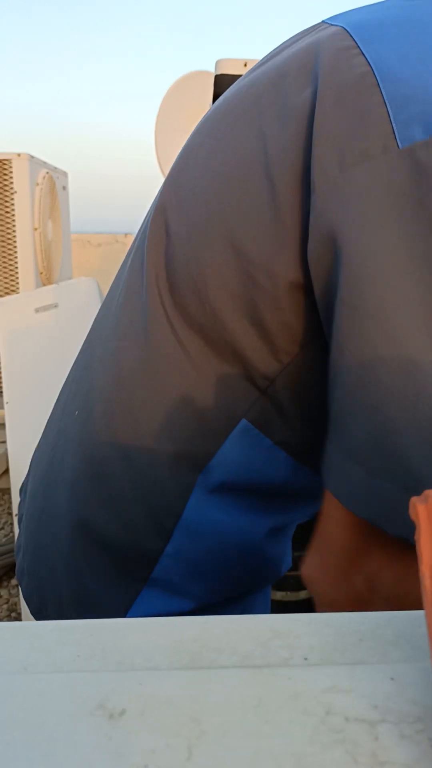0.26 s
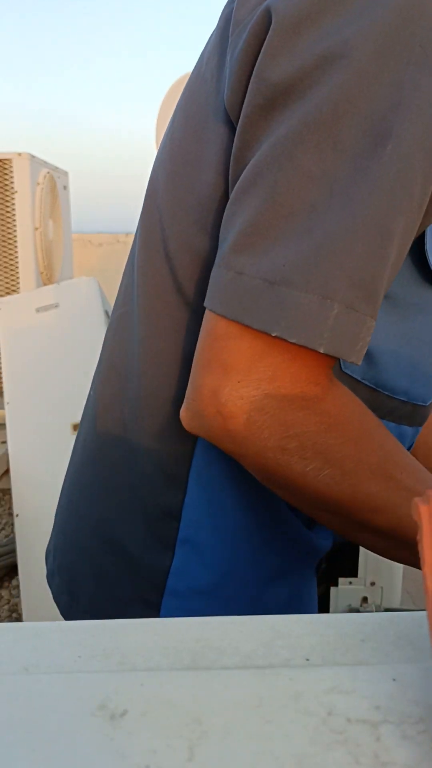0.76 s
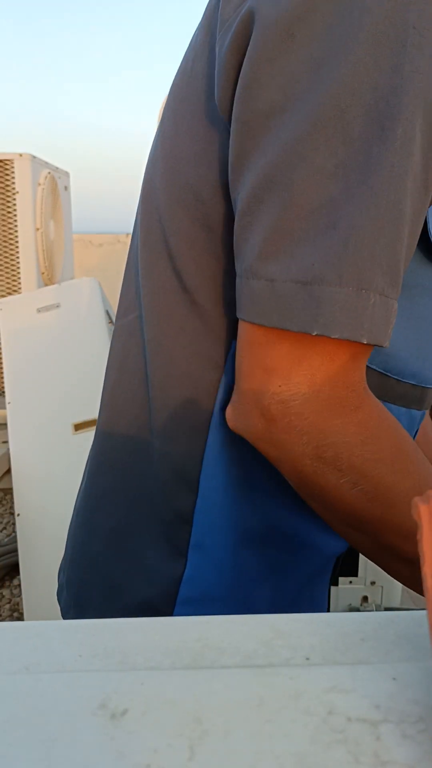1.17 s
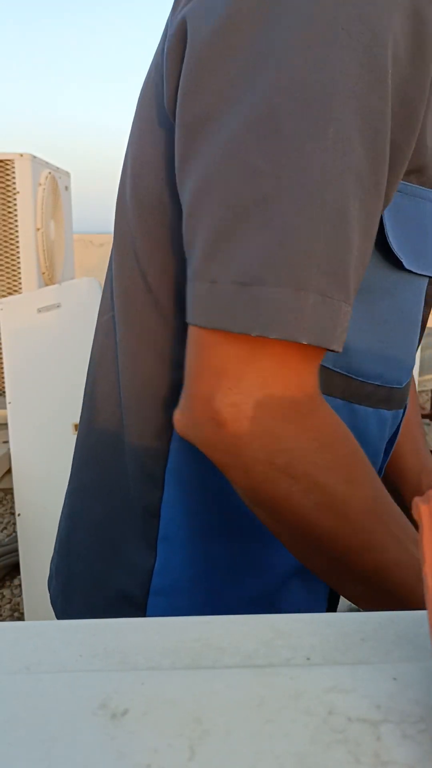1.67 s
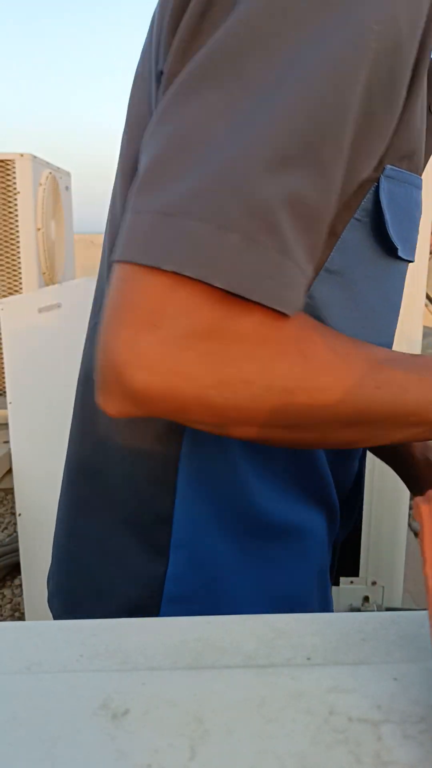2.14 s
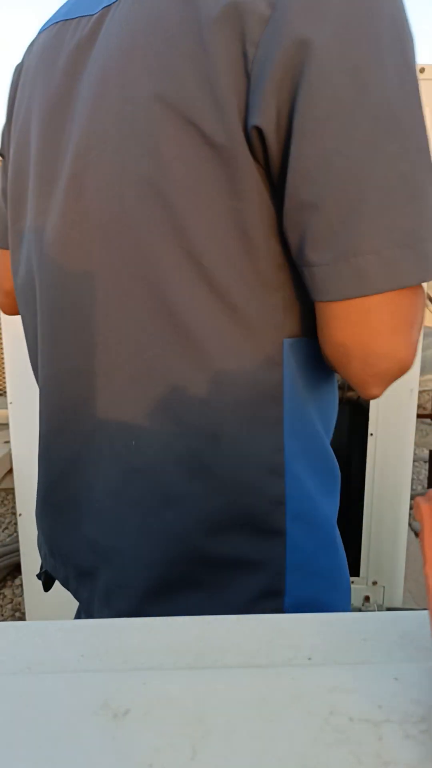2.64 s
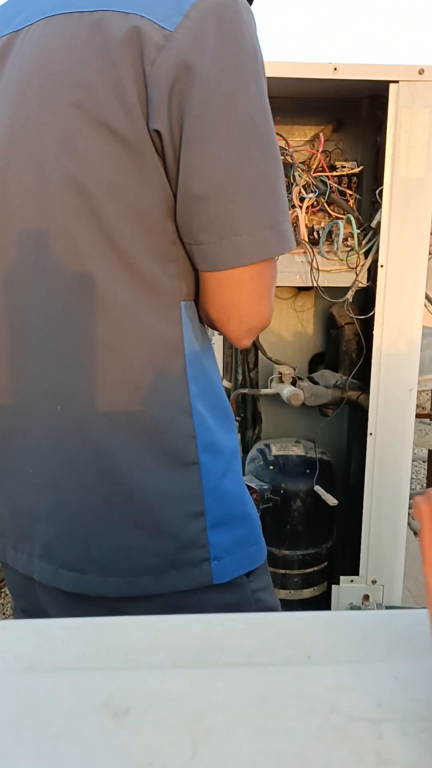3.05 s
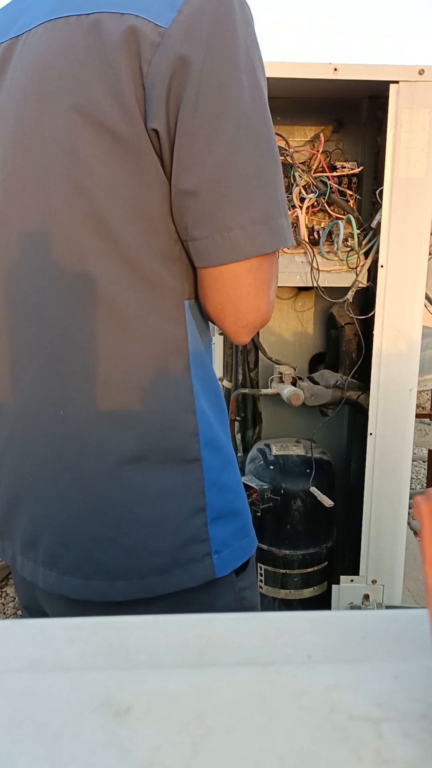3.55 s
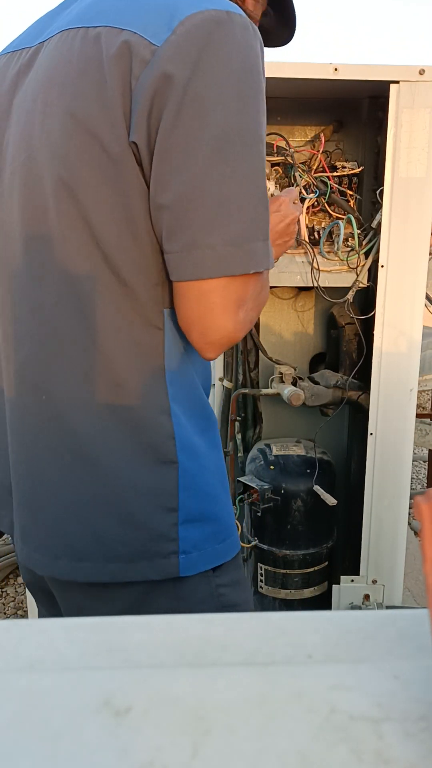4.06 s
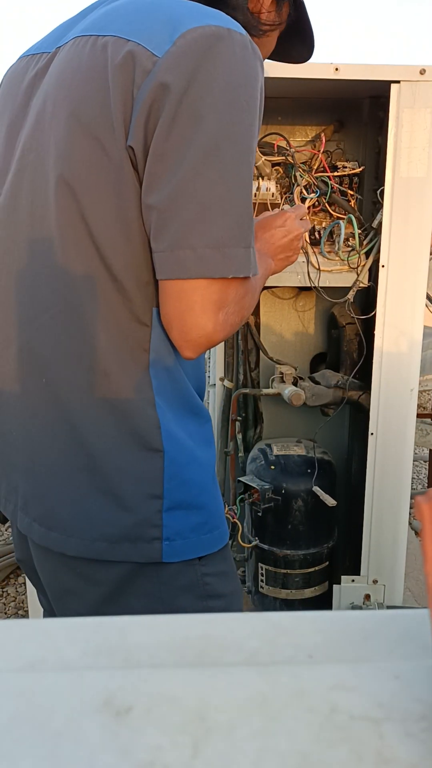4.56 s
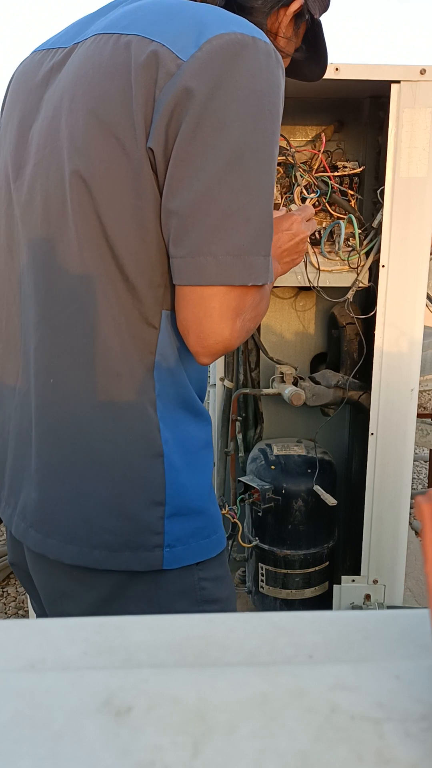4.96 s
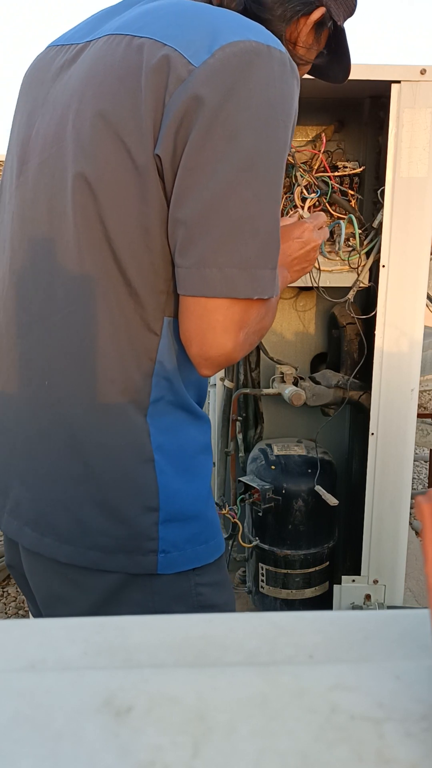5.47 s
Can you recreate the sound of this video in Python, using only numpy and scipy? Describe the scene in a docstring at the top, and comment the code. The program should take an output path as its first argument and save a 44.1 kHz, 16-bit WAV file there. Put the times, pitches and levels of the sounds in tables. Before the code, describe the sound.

Outdoors on a flat roof, air-conditioning units run constantly with rushing air, low hum, thin compressor whine and uneven fan throb. Rapid hard wind puffs slam the right side of a small stereo recorder for the first two-thirds of a second, with brief whistles. After a calmer spell the puffs return in looser groups. A few faint ticks from wiring pass almost unnoticed.

```python
"""Hard puffs of light wind buffet the right port of a small recorder at once, then return in looser groups.
Behind them air-conditioning units run on a flat roof: filtered noise for rushing air, sines for the
throbbing fan blades, the compressor's whine and the motors' hum. Early on the recorded level of the
background swells briefly. The wind is shaped noise plus rough tones; short whistles and small ticks
join it, and a limiter turns down the peaks."""
import sys
import numpy as np
from scipy import signal
from scipy.fft import rfft, irfft, next_fast_len
from scipy.io import wavfile
from scipy.ndimage import uniform_filter1d, minimum_filter1d, map_coordinates

SR = 44100
rng = np.random.default_rng(int(sys.argv[2]) if len(sys.argv) > 2 else 0)


def persist_wave(psi):
    """Save psi, clipped to +-1, as 16-bit WAV."""
    counts = np.round(np.clip(psi, -1, 1) * 32767).astype(np.int16)
    wavfile.write(sys.argv[1], SR, np.atleast_2d(counts).T)


N = 252252


def amp(db):
    """Decibels to gain."""
    return 10 ** (np.asarray(db) / 20)


def unit(x):
    """Scale to rms 1."""
    return x / np.sqrt(np.mean(x ** 2) + 1e-20)


def seconds():
    """Time of every sample."""
    return np.arange(N) / SR


def over_time(points):
    """Read (s, value) points at every sample."""
    return np.interp(seconds(), *np.transpose(points))


def along(points, hz):
    """Read (Hz, value) points on a log frequency axis."""
    f, v = np.transpose(points)
    return np.interp(np.log(hz + 1), np.log(f + 1), v)


def wobble(rate_hz):
    """Smooth random curve with rate_hz knots a second."""
    knots = rng.standard_normal(int(N * rate_hz / SR) + 4)
    return map_coordinates(knots, [seconds() * rate_hz])


def filtered(x, response):
    """Multiply the spectrum of x by a response of frequency."""
    m = next_fast_len(N + SR // 2)
    hz = np.fft.rfftfreq(m, 1 / SR)
    return irfft(rfft(x, m) * response(hz), m)[..., :N]


def tone(hz, level_db, drift_rad, flutter_db):
    """Machine tone whose phase and strength waver in the moving air."""
    phase = 2 * np.pi * (hz * seconds() + rng.random()) + drift_rad * wobble(3.0)
    return np.sqrt(2) * amp(level_db + flutter_db * wobble(5.05)) * np.sin(phase)


def wandering(hz, spread, flutter_db):
    """Rough tone of rms 1: pitch and strength change within a few cycles."""
    wandering_hz = hz * np.exp(spread * wobble(170))
    phase = 2 * np.pi * (np.cumsum(wandering_hz) / SR + rng.random())
    return unit(amp(flutter_db * wobble(130)) * np.sin(phase))


# Air rushing through fans and coils. Each row: frequency in Hz, density in dB per Hz before level_db.
AIR_SPECTRUM = [(20,-81),(45,-75),(75,-57.5),(160,-53),(195,-63.5),(220,-60.5),(250,-51.5),(350,-56.5),(450,-57),(560,-61.5),(660,-61.5),(760,-67.5),(970,-68),(1070,-71),(1200,-68),(1450,-72),(2200,-76),(4500,-81.5),(15500,-96.5)]
# Likeness of the rush at the two ports. Each row: frequency in Hz, coherence.
PORT_COHERENCE = [(60,0.94),(300,0.96),(640,0.91),(1400,0.72),(2100,0.46),(5000,0.24),(7500,.02)]


def air_rush(level_db, patchy_db):
    """Turbulent fan air: alike at both ports in the bass, nearly unrelated in the treble."""
    z = signal.stft(rng.standard_normal((2, N)), nperseg=512)[2]
    # strength varies in smooth patches of frequency and time
    patches = uniform_filter1d(rng.standard_normal(z.shape[1:]), size=6, axis=0)
    patches = unit(uniform_filter1d(patches, size=16, axis=1))
    pair = signal.istft(z * amp(patchy_db * patches), nperseg=512)[1][:, :N]

    def mid_side_response(hz):
        # mid and side shares cos and sin give the ports a coherence of cos(2 * angle)
        angle = np.arccos(along(PORT_COHERENCE, hz)) / 2
        return amp(along(AIR_SPECTRUM, hz)) * np.array([np.cos(angle), np.sin(angle)])

    mid, side = filtered(pair, mid_side_response)
    return amp(level_db) * np.sqrt(SR / 2) * np.array([mid + side, mid - side])


MAINS_HZ = 60.03
# Magnetic hum. Each row: multiple of the mains rate, level in dB rms before flutter and ports.
MAINS_HUM = [(2, -34), (4, -47.5), (6, -47.5), (10, -40.5)]


def motor_hum():
    """Motor magnetism hums at even multiples of the mains rate."""
    return sum(tone(k * MAINS_HZ, db, drift_rad=0.082, flutter_db=0.5) for k, db in MAINS_HUM)


SHAFT_HZ = 57.63
# Compressor tones. Each row: multiple of the shaft rate, starting level in dB rms before flutter
# and ports, growth in dB per s.
COMPRESSOR_TONES = [(6, -33, -0.29), (10, -37.5, 0.82), (12, -50.5, 0.5), (17, -55, 0), (18, -58.5, 0),
                    (21, -53, -2.2), (29, -64, 0), (38, -59.5, -0.2)]


def compressor():
    """The shaft turns a little slower than the mains and whines at its multiples."""
    whine = np.zeros(N)
    for k, start_db, db_per_s in COMPRESSOR_TONES:
        level_db = start_db + db_per_s * seconds()
        whine += tone(k * SHAFT_HZ, level_db, drift_rad=0.054, flutter_db=0.95)
    return whine


FAN_HZ, THROB_FLICKER_DB = 88.3, 2.5  # blade-passing rate, quick flicker in the turbulent air
# Blade tone as the fans drift in and out of step. Each row: time in s, level in dB rms before flicker and ports.
THROB_LEVELS = [(0.1, -40), (0.25, -46), (0.38, -31), (0.72, -33), (0.9, -44), (1.07, -33), (1.2, -40),
                (1.42, -27.5), (1.67, -37.5), (1.78, -29.5), (2.0, -29), (2.22, -43), (2.38, -34),
                (2.52, -38), (2.68, -27.5), (2.83, -32), (2.95, -39), (3.22, -34), (3.33, -35),
                (3.5, -28.5), (3.95, -37), (4.08, -31), (4.25, -29.5), (4.42, -34), (4.55, -32),
                (4.75, -35.5), (5.06, -29.5), (5.18, -46), (5.42, -27), (5.7, -35)]
# Steady overtones of the blades. Each row: frequency in Hz, level in dB rms before flutter and ports.
BLADE_OVERTONES = [(165, -51), (176.5, -46), (233, -48), (258, -55)]


def fans(drift_rad):
    """The blade tone throbs along its level curve, with mostly weaker overtones above."""
    throb = tone(FAN_HZ, over_time(THROB_LEVELS), drift_rad, flutter_db=-0.3)
    throb *= amp(THROB_FLICKER_DB * wobble(21.97))
    overtones = sum(tone(hz, db, drift_rad=0.55, flutter_db=3.0) for hz, db in BLADE_OVERTONES)
    return throb + overtones


# Colour of the left microphone port. Each row: frequency in Hz, gain in dB.
LEFT_PORT_COLOUR = [(800, -1), (2200, 1.5), (2700, -2.5), (3200, 2.5), (3800, -4.5), (4250, 0.5),
                    (5000, -2), (5650, 3.5), (6100, 0), (6600, 4.5), (7700, -19), (8600, -14), (10400, -4),
                    (11500, -3.5), (12700, 3), (13400, -0.5), (14200, 7), (14850, 1), (15500, 3)]
# Colour of the right microphone port. Each row: frequency in Hz, gain in dB.
RIGHT_PORT_COLOUR = [(100, -0.5), (200, 0.5), (350, -0.5), (600, -5.5), (950, 0), (1650, -4), (2200, -1.5),
                     (4500, -5), (6500, -9), (7500, -2), (8200, 1.5), (9000, -1), (9900, 1), (10600, -4),
                     (12200, -2.5), (14000, -17)]


def ports(x, lead_ms):
    """Each port colours the sound, which reaches the left one slightly earlier."""
    def response(hz):
        half_lead = np.pi * hz * lead_ms / 1000
        shift = np.exp(1j * half_lead * np.array([[1], [-1]]))
        return amp([along(LEFT_PORT_COLOUR, hz), along(RIGHT_PORT_COLOUR, hz)]) * shift

    return filtered(x, response)


SWELL_START_S, SWELL_END_S, SWELL_RISE_S, SWELL_FALL_S, SWELL_DB = 0.512, 0.854, 0.017, 0.06, 6.5


def swell():
    """Level of the background: jumps up, holds for about a quarter of a second, sinks back."""
    t = seconds()
    rise = (t - SWELL_START_S) / SWELL_RISE_S
    fall = (SWELL_END_S - t) / SWELL_FALL_S
    return amp(SWELL_DB * np.clip(np.minimum(rise, fall), 0, 1))


# Small ticks of wires and terminals under the fingers. Each row: start in s, peak in dB before colouring.
WIRE_TICKS = [(0.042, -31), (0.783, -27), (2.161, -31), (3.43, -36), (3.85, -31), (4.439, -32)]
# Colour of the ticks. Each row: frequency in Hz, gain in dB.
TICK_SPECTRUM = [(1000, -30), (3500, -9), (6000, 2), (15000, -3)]
TICK_T60_S = 0.01


def wires():
    """Each tick is a tiny bright noise crack with a steep exponential decay."""
    strength = np.zeros(N)
    for start_s, db in WIRE_TICKS:
        t = seconds() - start_s
        strength += (t >= 0) * amp(db - 60 * np.abs(t) / TICK_T60_S)
    noise = rng.uniform(-1, 1, (2, N))
    return filtered(strength * noise, lambda hz: amp(along(TICK_SPECTRUM, hz)))


# Whistles at the right port. Each row: centre in s, length in s, mean pitch in Hz, level at the centre in dB.
PORT_WHISTLES = [(0.082, 0.019, 660, -19), (0.259, 0.018, 680, -31), (0.401, 0.014, 800, -16.5),
                 (0.534, 0.022, 1205, -19), (0.633, 0.012, 980, -25)]


def whistles():
    """Air whistles for an instant across the edge of the right port."""
    right = np.zeros(N)
    for centre_s, length_s, hz, db in PORT_WHISTLES:
        envelope = np.exp(-(2 * (seconds() - centre_s) / length_s) ** 2)
        right += amp(db) * envelope * wandering(hz, spread=0.04, flutter_db=2.5)
    return np.array([np.zeros(N), right])


# Puffs on the exposed right port. Each row: centre in s, length in s, pressure in dB, eddy pitch in Hz,
# rasp in dB and thud in dB relative to the pressure.
WIND_PUFFS = [(0.049, 0.015, -7, 268.3, -19.5, -16), (0.083, 0.021, -1, 309.6, -16, -23),
              (0.107, 0.015, -7, 363.7, -28, -26), (0.129, 0.02, -6, 300.7, -25, -21),
              (0.174, 0.033, -8, 279.8, -13, -20), (0.203, 0.018, -8, 144.4, -32, -28),
              (0.261, 0.022, -15, 289.2, -12, -14), (0.29, 0.039, -12, 255, -26, -7),
              (0.383, 0.016, -7, 289, -10, -20), (0.4, 0.018, -4, 260.5, -5.5, -14),
              (0.417, 0.016, -5, 370.3, -20, -28), (0.471, 0.031, -3.5, 179.5, -11.5, -13),
              (0.513, 0.019, -3.5, 309.5, -19, -11), (0.533, 0.02, 0, 308.6, -11, -20),
              (0.57, 0.025, -17, 220.5, -18, -13), (0.616, 0.033, -10, 260.4, -22, -15),
              (0.656, 0.029, -7, 289.2, -18, -10), (1.074, 0.03, -22, 299.2, -18, -21),
              (1.475, 0.06, -19, 250.6, -30, -8), (1.628, 0.039, -24.5, 250.1, -16, -3),
              (2.717, 0.028, -13.5, 281, -18, -6), (2.768, 0.016, -18, 230.2, -20, -8),
              (2.798, 0.017, -16.5, 231.4, -20, -11), (3.856, 0.025, -8.5, 308, -14, -24),
              (3.879, 0.018, -7, 224.8, -11, -10), (3.904, 0.024, -7, 296, -15.5, -11),
              (3.931, 0.021, -2, 294, -14.5, -22), (3.956, 0.02, -10, 199.4, -19, -13),
              (4.015, 0.03, -16.5, 170.6, -20, -2), (4.307, 0.013, -19, 198.8, -24, -27),
              (4.361, 0.03, -10.5, 288.5, -19.5, -26), (4.396, 0.015, -10, 272.9, -13, -24),
              (4.498, 0.018, -10.5, 274.5, -25, -24), (4.527, 0.0062, -14.5, 250, -22, -16),
              (4.866, 0.012, -18.5, 282.7, -22, -14), (5.279, 0.015, -18, 221, -25, -18),
              (5.317, 0.027, -4.5, 280.8, -15.5, -15), (5.38, 0.022, -9.5, 200, -23, -7),
              (5.578, 0.039, -30, 199.7, -23, 2), (5.715, 0.011, -10, 258.7, -30, -23)]
# Light breeze under the puffs. Each row: time in s, pressure in dB.
BREEZE_PRESSURE = [(0, -21.5), (.65, -39), (.85, -41), (1.05, -36), (1.5, -33), (1.95, -36.5), (2.5, -39),
                   (3.149, -44), (3.75, -39), (4.05, -30.5), (4.5, -34), (5.1, -39), (5.45, -24.5),
                   (5.7, -31)]
# Deep rumbles that reach the sheltered left port. Each row: centre in s, length in s, pressure in dB.
LEFT_RUMBLES = [(1.57, 0.092, -34), (2.79, 0.062, -27), (3.937, 0.11, -36)]
CALM_PITCH_HZ, CALM_RASP_DB, CALM_THUD_DB = 270.1, -20, -6
# slower air around each puff; its level follows half the puff's dB
WAKE_DB, WAKE_RISE_S, WAKE_FALL_S = -16.5, 0.024, 0.053
LEE_BREEZE_DB, LEE_WAKE_DB = -53, -20  # left port: own breeze, share of the wakes


def pressure(edge):
    """Wind pressure per port from puffs, wakes and breeze, with eddy pitch and shares of rasp and thud."""
    now = seconds()

    def plateau(centre_s, length_s):
        return 1 / (1 + np.abs(2 * (now - centre_s) / length_s) ** edge)

    puffs, wakes, pitch_hz = np.zeros(N), np.zeros(N), np.full(N, CALM_PITCH_HZ)
    rasp, thud = np.full(N, amp(CALM_RASP_DB)), np.full(N, amp(CALM_THUD_DB))
    for centre_s, length_s, db, hz, rasp_db, thud_db in WIND_PUFFS:
        shape = plateau(centre_s, length_s)
        puffs += amp(db) * shape
        # each puff pulls pitch and shares towards its own
        pitch_hz += shape * (hz - pitch_hz)
        rasp += shape * (amp(rasp_db) - rasp)
        thud += shape * (amp(thud_db) - thud)
        wake_s = np.where(now < centre_s, WAKE_RISE_S, WAKE_FALL_S)
        wake = np.exp(-np.abs(now - centre_s) / wake_s)
        wakes = np.maximum(wakes, amp(WAKE_DB + db / 2) * wake)
    rumbles = sum(amp(db) * plateau(centre_s, length_s) for centre_s, length_s, db in LEFT_RUMBLES)
    left = rumbles + amp(LEE_WAKE_DB) * wakes + amp(LEE_BREEZE_DB)
    right = np.sqrt(puffs ** 2 + wakes ** 2 + amp(over_time(BREEZE_PRESSURE)) ** 2)
    return left, right, pitch_hz, rasp, thud


def eddies(spectrum, knee_hz, steady):
    """Eddy pressure of rms 1: low-passed noise, its strength evened out by steady (0 to 1)."""
    noise = rng.standard_normal(N)
    x = unit(filtered(noise, lambda hz: amp(along(spectrum, hz)) / np.hypot(1, hz / knee_hz)))
    strength = np.sqrt(np.abs(uniform_filter1d(x ** 2, size=500)) + 1e-3)
    return unit(x / strength ** steady)


# Broad buffeting of a port. Each row: frequency in Hz, relative density in dB.
BUFFET_SPECTRUM = [(20, -41), (45, -27), (80, 3.5), (140, 5), (190, -1.5), (290, 5), (430, 1.5), (600, -14),
                   (1000, -47), (1600, -55), (4000, -66), (9000, -87)]
# Rasp of fine eddies, strongest in hard puffs. Each row: frequency in Hz, relative density in dB.
RASP_SPECTRUM = [(200, -13), (400, 4.5), (620, 2), (860, -8), (1200, -15), (1600, -27.5), (3500, -41),
                 (7000, -51)]
# Thud of the largest eddies. Each row: frequency in Hz, relative density in dB.
THUD_SPECTRUM = [(15, -44), (30, -17), (50, 0), (70, 4), (140, -13), (500, -70), (2000, -110)]
SHEDDING_DB, LEE_THUD_DB = -1, -3  # pitched shedding and left thud, both relative to buffeting


def wind(bright_db, spurt_db):
    """Faster air makes smaller eddies, shed at a rough pitch, so strong puffs are brighter and firmer."""
    left, right, pitch_hz, rasp, thud = pressure(edge=6.23)
    fast = right ** 2 / (right ** 2 + amp(bright_db) ** 2)
    shedding = amp(SHEDDING_DB) * wandering(pitch_hz, spread=0.12, flutter_db=2.5)
    strong = unit(eddies(BUFFET_SPECTRUM, knee_hz=1500, steady=0.46) + shedding)
    weak = eddies(BUFFET_SPECTRUM, knee_hz=207, steady=0.59)
    exposed = np.sqrt(fast) * strong + np.sqrt(1 - fast) * weak
    spurts = amp(spurt_db * wobble(110))
    exposed += rasp * spurts * eddies(RASP_SPECTRUM, knee_hz=4000, steady=0.41)
    exposed += thud * eddies(THUD_SPECTRUM, knee_hz=200, steady=0.51)
    # the sheltered port catches mainly slow, deep eddies
    sheltered = eddies(BUFFET_SPECTRUM, knee_hz=35, steady=0.68)
    sheltered += amp(LEE_THUD_DB) * eddies(THUD_SPECTRUM, knee_hz=200, steady=0.4)
    return np.array([left * sheltered, right * exposed])


def scene():
    """Background as both ports hear it, the wires, and the wind on the ports."""
    machines = air_rush(level_db=0.64, patchy_db=0.99) + fans(drift_rad=0.57) + compressor() + motor_hum()
    background = swell() * ports(machines, lead_ms=0.078)
    return background + wires() + whistles() + wind(bright_db=-15.0, spurt_db=3.0)


CEILING, TOP_HZ = 0.88, 15780  # limiter peak before band-limiting, upper band limit


def limiter(x):
    """Turn each channel down just ahead of its peaks and hold it for a moment."""
    need = np.minimum(1, CEILING / (np.abs(x) + 1e-9))
    held = minimum_filter1d(need, size=440, axis=1)
    return x * uniform_filter1d(held, size=300, axis=1)


def record(dry):
    """The recorder limits the peaks and keeps nothing above its band limit."""
    return filtered(limiter(dry), lambda hz: hz < TOP_HZ)


dry = scene()
out = record(dry)
persist_wave(out)
```